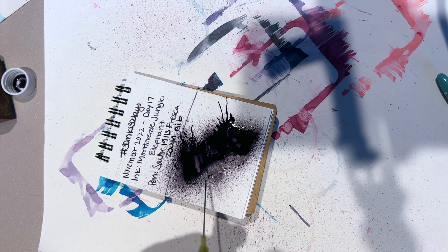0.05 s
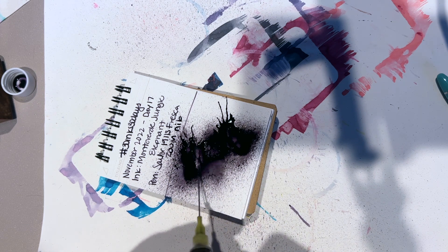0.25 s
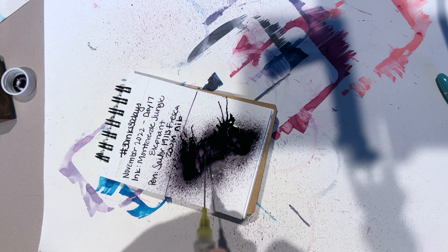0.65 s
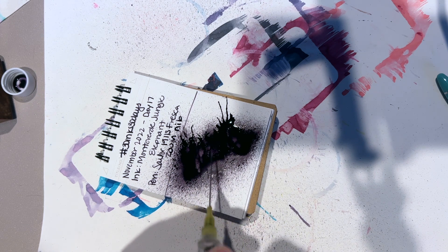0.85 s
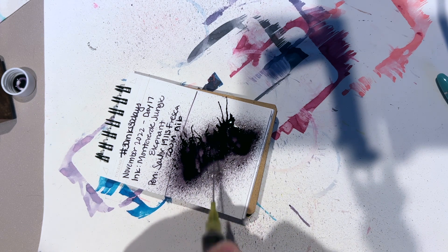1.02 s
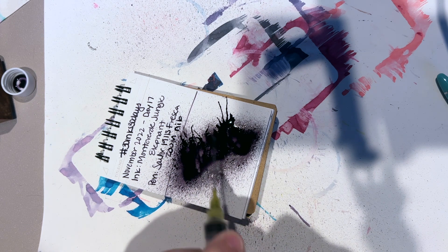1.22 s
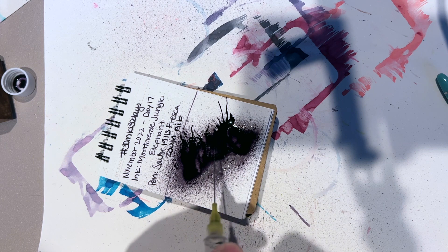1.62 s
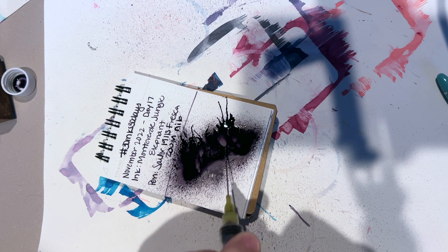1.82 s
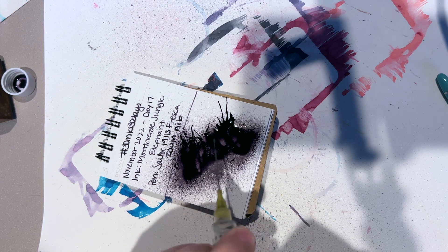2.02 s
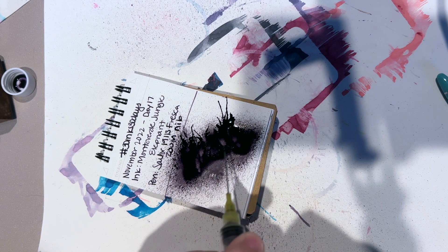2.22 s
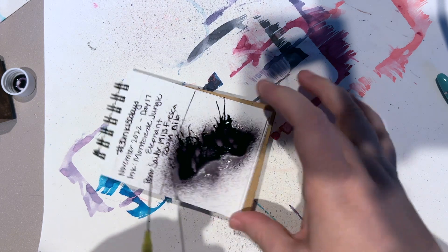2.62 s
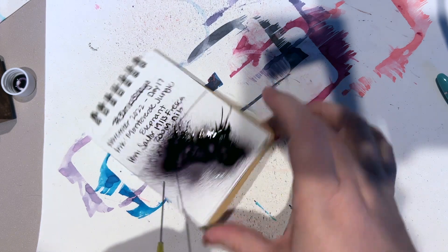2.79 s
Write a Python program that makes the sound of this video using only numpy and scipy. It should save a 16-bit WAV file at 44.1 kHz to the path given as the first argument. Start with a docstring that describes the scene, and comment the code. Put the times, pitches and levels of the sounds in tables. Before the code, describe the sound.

A rubber air bulb squeezed in short hissing puffs, followed by a brief notebook slide.

```python
"""A desk in a quiet room, the microphone close to a notebook, a slow draught rumbling across it.
A rubber air bulb sucks in air, most times with a thin falling squeak, and is squeezed at a pen tip,
eight times over: the jet swells, usually spits ink, and stops dead with a small ringing thump.
Hard tools click now and then, loudest just after the last jet. Then the notebook is slid round
on the paper-covered desk, with a soft knock as a tool is laid down and two more clicks."""
import sys
import numpy as np
from scipy import signal
from scipy.fft import rfft, irfft
from scipy.io import wavfile

SR = 44100
rng = np.random.default_rng(int(sys.argv[2]) if len(sys.argv) > 2 else 0)


def waveform_to_disk(signal):
    """Save audio, clipped to [-1, 1], as 16-bit WAV at the path in sys.argv[1]."""
    frames = np.transpose(np.atleast_2d(signal))
    scaled = np.clip(frames, -1, 1) * 32767
    samples = np.round(scaled).astype(np.int16)
    wavfile.write(sys.argv[1], SR, samples)


N = 130095
TIME = np.arange(N) / SR

# squeezes of the bulb: stop_s, full_flow_s, jet_db, body_boost_db, rasp_db, thump_db, ring_db
SQUEEZES = [(.2230, 0.035, -38.5, 3, -68, -38, -41.5), (0.4831, 0.042, -40.5, 0, -82, -39, -47),
            (.7000, 0.03, -37.5, 1.5, -72, -36.5, -42), (0.9564, 0.039, -37, -2, -71, -39, -40),
            (1.202, 0.046, -42.5, 1.5, -56.5, -38.5, -46.5), (1.425, 0.045, -44.5, 4.5, -57, -40, -49.5),
            (1.8008, .045, -39.5, -2, -66.5, -37.5, -41), (2.0967, .036, -41.5, 3.5, -60, -37.5, -40)]


def from_db(db):
    """Decibels to gain."""
    return 10 ** (np.asarray(db) / 20)


def unit_power(x):
    """Scale to unit power."""
    return x / np.sqrt(np.mean(x ** 2) + 1e-20)


def gain_curve(rows):
    """Gain over time from rows of time_s, level_db."""
    return from_db(np.interp(TIME, *np.transpose(rows)))


def noise(spectrum):
    """Unit-power noise coloured by rows of frequency_hz, density_db."""
    hz, db = np.transpose(spectrum)
    bins_hz = np.maximum(np.fft.rfftfreq(N, 1 / SR), 1)
    colour = from_db(np.interp(np.log(bins_hz), np.log(hz), db))
    return unit_power(irfft(rfft(rng.standard_normal(N)) * colour, N))


def lowpass(x, hz, order=2):
    """Causal low-pass."""
    sos = signal.butter(order, min(hz, SR / 2 - 1000), fs=SR, output="sos")
    return signal.sosfilt(sos, x + 1e-18)


def flutter(hz):
    """Random wavering up to a rate, at unit power."""
    return unit_power(lowpass(rng.standard_normal(N), hz))


def ring(impulse, hz, t60_s):
    """A unit impulse sets off a decaying sine of height 1."""
    decay, step = from_db(-60 / (t60_s * SR)), 2 * np.pi * hz / SR
    return signal.lfilter([0, np.sin(step)], [1, -2 * decay * np.cos(step), decay ** 2], impulse + 1e-18)


def strike(time_s, modes, alternate=False):
    """One blow on a set of modes; with alternate, neighbours swing in opposite directions."""
    impulse = np.zeros(N)
    impulse[int(time_s * SR)] = 1
    return sum((-1) ** (k * alternate) * from_db(db) * ring(impulse, hz, t60_s)
               for k, (hz, db, t60_s) in enumerate(modes))


def airy_tone(hz, width_hz):
    """A noisy resonance that follows a pitch."""
    phase = 2 * np.pi * np.cumsum(hz) / SR
    return unit_power(flutter(width_hz) * np.cos(phase) + flutter(width_hz) * np.sin(phase))


def room_tone(level_db=-61.5):
    """The steady quiet of the room, strongest in the bass."""
    # colour of the quiet: frequency_hz, density_db
    spectrum = [(30, 8.5), (60, -3), (130, -9.5), (230, -6), (400, -14), (640, -14), (950, -20.5),
                (1300, -16.5), (1510, -18), (1700, -20), (2600, -24), (5000, -23.5), (8200, -23.5),
                (16000, -25)]
    return from_db(level_db) * noise(spectrum)


def draught():
    """Slow air on the microphone makes a very deep rumble."""
    # strength of the draught: time_s, level_db
    strength = [(0, -51.5), (.6, -45), (.85, -40), (1.9, -37.5), (2.2, -45.5), (2.65, -44.5), (2.8, -61),
                (2.95, -63)]
    # its rumble: frequency_hz, density_db
    rumble = [(3, -10.5), (7, -2), (11, -1), (20, -20.5), (30, -32), (60, -43), (150, -79), (500, -110)]
    return gain_curve(strength) * noise(rumble)


def notebook_slide(grain_db=2, bright_hz=14000):
    """The cover rubs over paper with a fine grain, brighter the faster it goes."""
    # speed of the slide, as loudness: time_s, level_db
    slide = [(2.33, -71), (2.45, -66.5), (2.56, -71.5), (2.63, -60), (2.73, -58.5), (2.785, -55.5),
             (2.83, -53), (2.88, -61), (2.92, -70.5), (2.95, -70)]
    # paper on paper: frequency_hz, density_db
    paper = [(150, 2), (500, -3), (1000, 0), (1800, 1.5), (2650, -8), (3700, -4.5), (5450, 3), (6700, -5),
             (7500, 1.5), (8600, 2), (9800, -8), (12000, -5.5), (13700, -3), (16000, -1.5)]
    speed = (TIME > slide[0][0]) * gain_curve(slide)
    bright_hiss = speed / speed.max() * airy_tone(np.full(N, bright_hz), width_hz=2800)
    return speed * (noise(paper) + bright_hiss) * from_db(grain_db * flutter(hz=300))


def desk_knock(time_s=2.4912, gain_db=-56):
    """A tool is laid down and the desk rings briefly."""
    # modes of the desk: pitch_hz, level_db, t60_s
    desk = [(430, -1.5, 0.033), (610, 2, 0.023), (820, 0, 0.022), (1100, -8, .012)]
    return from_db(gain_db) * strike(time_s, desk, alternate=True)


def ink_tick_and_tool_clicks():
    """Spitting ink ticks sharply just after the first jet stops; later, plastic tools click."""
    # the ink tick, then the tool clicks: time_s, relative_db, cutoff_hz
    ticks = [(0.2405, -38, 14100), (.978, -47, 7000), (1.815, -40, 4500), (1.82, -44, 9000),
             (2.2768, -35.5, 2420), (2.3085, -26, 12800), (2.671, -43, 14000), (2.825, -55, 9000)]
    # short, bright ring of each: pitch_hz, level_db, t60_s
    modes = [(710, -8, 0.006), (1240, -6.5, 0.0098), (1945, -6, 0.019), (2594, -9, .016),
             (3320, -2.5, 0.0093), (4160, -4.5, 0.0044), (5000, -13.5, 0.017), (5800, -6, 0.005),
             (7700, -4.5, .005), (8700, -2.5, 0.0057), (12500, -8, .005), (14500, -4, 0.0044)]
    return sum(from_db(db - 12.5) * lowpass(strike(time_s, modes, alternate=True), cutoff_hz)
               for time_s, db, cutoff_hz in ticks)


def bulb_refills(valve_hz=5330, sag_fraction=.15, fade_db=12.5):
    """Air is drawn back through the valve, whose resonance sags and fades as the suction eases."""
    # refills: start_s, length_s, hiss_db, valve_db
    refills = [(0.056, 0.095, -66.5, -64), (0.319, 0.11, -64.5, -65.5), (0.559, 0.084, -67.5, -62.5),
               (0.802, .09, -57.5, -59), (1.036, 0.083, -58.5, -58), (1.255, 0.096, -57.5, -60.5),
               (1.528, .16, -64.5, -64.5), (1.943, 0.11, -67, -63.5)]
    # air drawn in: frequency_hz, density_db
    intake = [(500, -3), (900, -1.5), (2000, -2), (2800, -6), (5200, -11.5), (6700, -12.5), (8200, 3.5),
              (9800, -8.5), (12000, -3), (15000, 3)]
    sag, hiss_gain, valve_gain = np.zeros((3, N))
    for start_s, length_s, hiss_db, valve_db in refills:
        progress = np.clip((TIME - start_s) / length_s, 0, 1)
        arch = np.abs(np.sin(np.pi * progress))
        sag += sag_fraction * progress * (progress < 1)
        hiss_gain += from_db(hiss_db) * arch
        valve_gain += from_db(valve_db - fade_db * progress) * np.sqrt(arch)
    return hiss_gain * noise(intake) + valve_gain * airy_tone(valve_hz * (1 - sag), width_hz=410)


def valve_squeaks(base_hz=11000, glide_hz=4000, glide_s=.019, fade_db=5):
    """The closing valve gives a thin, quickly falling squeak in most refills."""
    # squeaks: time_s, level_db
    squeaks = [(.117, -64), (.379, -69), (.625, -71), (0.852, -60), (1.081, -65), (1.622, -69),
               (2.016, -68)]
    gain, glide = np.zeros((2, N))
    for time_s, db in squeaks:
        age = np.clip((TIME - time_s) / glide_s, -1, 2)
        glide += np.exp(-age) * (age > -1) * (age < 2)
        window = (1 + age) * (1 - age / 2) ** 2
        gain += from_db(db - fade_db * age) * window
    return gain * airy_tone(base_hz + glide_hz * glide, width_hz=170)


def ink_gurgles(rise_per_s=7.3):
    """Wet ink in the tip resonates briefly, rising in pitch."""
    # gurgles: centre_s, spread_s, pitch_hz, level_db
    gurgles = [(0.844, 0.0087, 860, -63), (0.856, 0.0047, 1904, -64.5), (1.296, 0.012, 1820, -66)]
    out = np.zeros(N)
    for centre_s, spread_s, hz, db in gurgles:
        offset_s = TIME - centre_s
        swell = from_db(db) * np.exp(-.5 * (offset_s / spread_s) ** 2)
        out += swell * airy_tone(hz * (1 + rise_per_s * offset_s), width_hz=150)
    return out


def ink_spits(decay_s=.0005):
    """Drops tear off the tip in tiny bright bursts."""
    # spits: start_s, relative_db
    spits = [(.180, -62), (0.2035, -34), (.2408, -44), (.434, -37), (.438, -36), (0.4582, -33),
             (0.464, -35), (.6665, -62.5), (.685, -25.5), (0.9128, -40), (0.917, -42), (0.9349, -27),
             (1.1512, -36), (1.1736, -30), (1.378, -49)]
    # flying drops: frequency_hz, density_db
    spray = [(1000, -37), (3000, -21), (5300, -10), (6700, -16), (8300, -5), (9700, -15), (12000, -1),
             (16000, -9)]
    bursts = sum(from_db(db - 6) * (TIME >= start_s) * np.exp(-np.clip((TIME - start_s) / decay_s, 0, 20))
                 for start_s, db in spits)
    return bursts * noise(spray)


def bulb_thumps(dip_s=.00207, sag_s=.0058, edge_hz=2530):
    """The stopping flow leaves a short dip of pressure and sets the bulb ringing."""
    # modes of the bulb: pitch_hz, level_db, t60_s
    bulb = [(1485, 0, .023), (1512, -17, .19), (1350, -19, .03), (634, -32, .12), (450, -19, .025)]
    out = np.zeros(N)
    for stop_s, *_, thump_db, ring_db in SQUEEZES:
        gate = np.clip((stop_s + dip_s - TIME) * SR, 0, 1) * (TIME >= stop_s)
        dip = gate * np.exp(-np.abs(TIME - stop_s) / sag_s)
        out -= from_db(thump_db) * lowpass(dip, edge_hz) + from_db(ring_db) * strike(stop_s, bulb)
    return out


def air_jets(swell_s=.025, swell_db=18, shut_s=.00097, rough_db=.25, body_hz=5560):
    """Turbulent hiss swells with the squeeze and is cut off when the bulb is empty."""
    # hiss of the jet: frequency_hz, density_db
    jet_spectrum = [(200, -30.5), (800, -30), (1300, -14.5), (2050, -24), (2550, -32), (3000, -24.5),
                    (3400, -21), (4150, -16.5), (4500, -16), (5250, -12), (5600, -13.5), (6150, -14.5),
                    (6700, -19.5), (7800, -6.5), (8300, -6.5), (8900, -6.5), (9600, -17), (10400, -11.5),
                    (11200, -3.5), (11900, -2), (14000, -4), (16000, -5.5)]
    # ink rasping in the jet: frequency_hz, density_db
    rasp_spectrum = [(200, 2), (650, 0), (1200, -1.5), (2150, -3.5), (2700, -10.5), (5000, -35)]
    air = noise(jet_spectrum) * from_db(rough_db * flutter(hz=346))
    body = lowpass(lowpass(air, body_hz)[::-1], body_hz)[::-1]  # both ways, to stay in phase with the air
    rasp = noise(rasp_spectrum)
    out = np.zeros(N)
    for stop_s, full_flow_s, jet_db, body_boost_db, rasp_db, _, _ in SQUEEZES:
        swell_left = np.clip(1 - (TIME - stop_s + full_flow_s) / swell_s, 0, 10)
        shutoff = np.exp(-np.clip((TIME - stop_s) / shut_s, 0, 20))
        flow = from_db(-swell_db * swell_left ** 2) * shutoff
        hiss = air + (from_db(body_boost_db) - 1) * body
        out += flow * (from_db(jet_db) * hiss + from_db(rasp_db) * rasp)
    return out


def add_room(direct, mid_lift_db=10):
    """Quick reflections from the desk and a faint tail from the walls, both lifted in the mids."""
    t = TIME[:SR // 2]
    response = np.zeros(len(t))
    for db, t60_s in ((-25.5, .039), (-22.5, .34)):  # desk, walls
        tail = rng.standard_normal(len(t)) * from_db(-60 * t / t60_s) * (t > .002)
        response += from_db(db) * tail / np.linalg.norm(tail)
    mids = lowpass(response, hz=2230) - lowpass(response, hz=239, order=1)
    return direct + signal.fftconvolve(direct, response + from_db(mid_lift_db) * mids)[:N]


def scene():
    """Bulb, ink, tools and notebook close to one microphone, over room tone and draught."""
    blowing = air_jets() + bulb_thumps() + ink_spits() + bulb_refills() + valve_squeaks() + ink_gurgles()
    direct = blowing + ink_tick_and_tool_clicks() + desk_knock() + notebook_slide()
    return (add_room(direct) + room_tone() + draught())[None]


def record(dry):
    """The recorder cuts the treble steeply above 15.8 kHz."""
    return signal.sosfilt(signal.ellip(12, .1, 80, 15800, fs=SR, output="sos"), dry)


dry = scene()
out = record(dry)
waveform_to_disk(out)
```